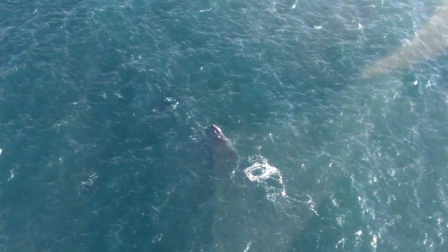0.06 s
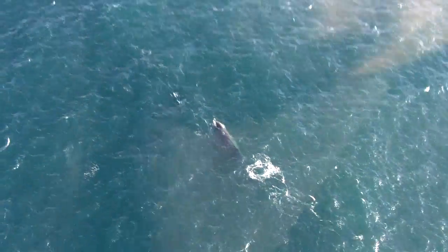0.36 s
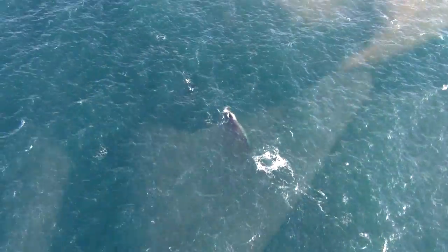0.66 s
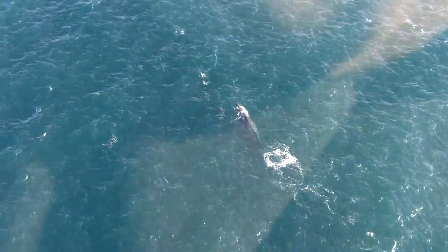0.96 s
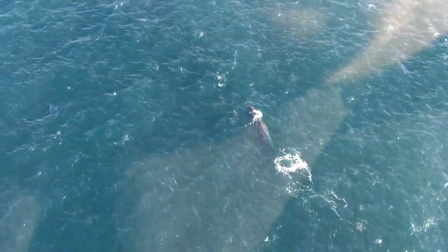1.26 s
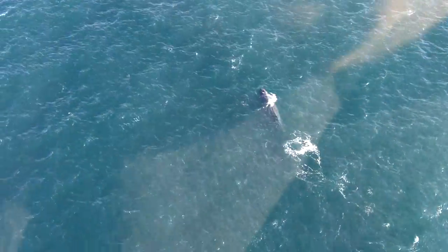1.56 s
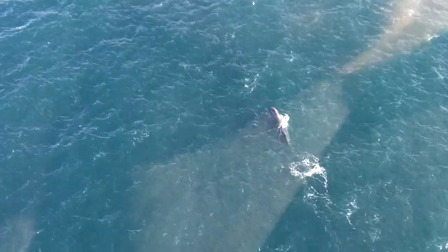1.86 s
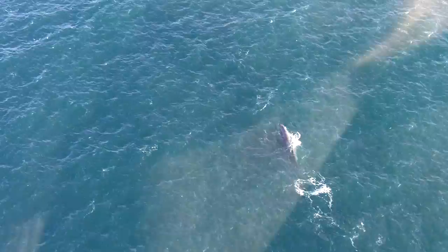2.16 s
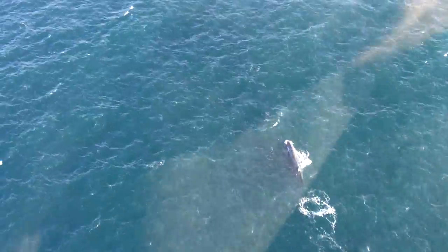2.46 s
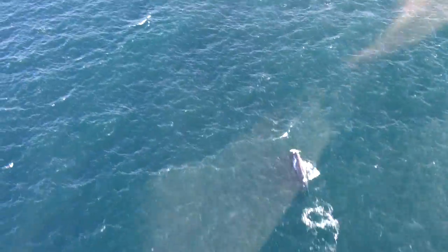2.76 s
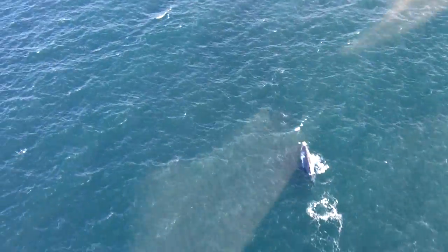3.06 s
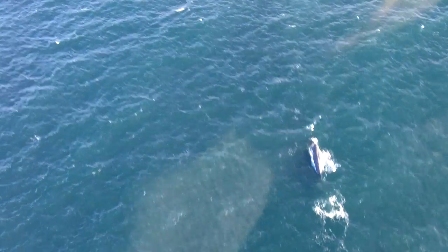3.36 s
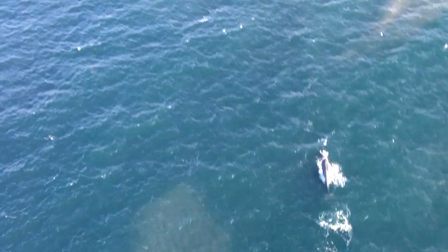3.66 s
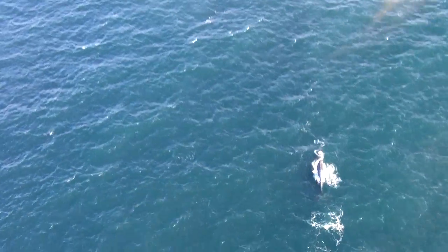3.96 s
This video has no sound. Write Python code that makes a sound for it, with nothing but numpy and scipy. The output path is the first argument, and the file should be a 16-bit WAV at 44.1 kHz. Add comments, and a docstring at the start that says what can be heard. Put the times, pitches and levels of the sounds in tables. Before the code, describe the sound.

Heard from inside the cabin over the sea, a helicopter holds a steady low hum with fast, booming blade beats. Wind gusts briefly at the start, then eases to an even roar, while gears whine very faintly.

```python
"""Inside a helicopter over the sea

The tail rotor drones on one strong low note. Under it the main rotor's blades thump rapidly,
each one pushing on the cabin and making it boom. The slipstream, the air streaming past, roars
and flutters with a thin hiss; it buffets harder for the first second, then settles.
The gears in the gearbox whine faintly."""
import sys
import numpy as np
from scipy import signal
from scipy.fft import rfft, irfft
from scipy.io import wavfile

SR = 44100
rng = np.random.default_rng(int(sys.argv[2]) if len(sys.argv) > 2 else 0)


def unload_audio(sound):
    """Save the sound as a 16-bit wav file, at the path given as the first command line argument."""
    columns = np.transpose(np.atleast_2d(sound))
    # keep every value between -1 and 1, then stretch to whole-number steps
    steps = np.round(np.clip(columns, -1, 1) * 32767)
    wavfile.write(sys.argv[1], SR, steps.astype(np.int16))


N = 176400
TIME = np.arange(N) / SR
TAIL_HZ, BLADE_HZ, FIRST_BLADE_S = 136.14, 13.614, .0698
# How many dB each sound rises when the gust rises by 1 dB.
BOOM_FOLLOWS, ROAR_FOLLOWS, RUSH_FOLLOWS, HISS_FOLLOWS = 2.8, .65, .7, 1.25

# The tones in the tail rotor's drone. Each row: multiple of TAIL_HZ, average level in dB.
DRONE_TONES = [(1, -14), (2, -42), (3, -53)]
# The tones that add up to a blade's thump. Each row: multiple of BLADE_HZ, level in dB.
THUMP_TONES = [(1, -20), (2, -34.5), (3, -38), (6, -51), (7, -48.5), (8, -50.5), (9, -51.5), (11, -37),
               (12, -47.5), (14, -40), (15, -49), (17, -58), (18, -51.5)]
# The cabin's ringing notes. Each row: pitch in Hz, strength of a blow in dB, seconds to fade by 60 dB.
CABIN_NOTES = [(53.5, -25.5, .26), (244.5, -37.5, .25)]
# The strength of the slipstream. Each row: time in seconds, strength in dB.
GUST_CURVE = [(0, 4), (.17, 4), (.55, 3), (.8, 3.5), (1.1, 2.04), (1.4, 1), (2.0, 1), (2.7, 0.94), (3.2, 1),
              (4, 0.4)]
# The air's four noises, from low to high. Each row: frequency in Hz, relative level in dB.
ROAR_SPECTRUM = [(15, 0), (40, -3.5), (85, -2), (125, 4), (175, -3), (250, -2.5), (310, -7.5), (390, -10.5),
                 (480, -14.5), (545, -14.5), (620, -20), (820, -21.5), (1040, -26), (1210, -28.5),
                 (1300, -35.5), (2500, -57)]
RUSH_SPECTRUM = [(400, -8.5), (900, 3), (1270, -5.5), (1450, 0.5), (1750, -3.5), (2000, -4), (2200, -6.5),
                 (2600, -8.5), (3100, -13.5), (3700, -20), (4300, -28.5), (8000, -48.5)]
HISS_SPECTRUM = [(2500, -14.5), (4300, -18), (4750, -8.5), (5300, -3), (6250, -0.5), (7500, -5),
                 (9000, -12), (11000, -24), (15500, -35.5)]
SIZZLE_SPECTRUM = [(4000, -20.5), (7000, -5), (9000, -0.5), (11000, -2.5), (12500, -7), (15500, -11)]
# How wide the air sounds. Each row: frequency in Hz, left-right difference against the shared part in dB.
STEREO_WIDTH = [(60, -29), (240, -38), (480, -32.5), (950, -39), (1890, -19), (3770, -4.5), (6300, -6.5),
                (9000, -2.5), (15000, -4.5)]
# Brief swells of the roar and of the hiss. Each row: time of the peak in seconds, level change in dB.
ROAR_BUFFETS = [(.47, 3), (.625, 4), (1.04, 3), (1.265, 2)]
HISS_SPURTS = [(.138, 1), (0.297, 1.5), (.618, 4.5), (0.745, 6), (.83, 5), (0.902, 2), (1.049, 6),
               (1.108, 5), (1.193, 4.5), (1.231, 3.5), (1.487, -0.5), (1.721, 5.5), (1.82, 1), (3.168, -1),
               (3.222, 5), (3.376, 0.5), (3.659, 7)]
# The whine of the gears. Each row: pitch in Hz, average level in dB.
GEAR_TONES = [(614, -64), (1093, -69), (1164, -62.5), (1210, -70.5), (1302, -72)]


def tail_rotor(wavers_per_s=11):
    """The tail rotor makes a nearly pure drone that wavers in the disturbed air."""
    phase = 2 * np.pi * TAIL_HZ * (TIME - FIRST_BLADE_S) + .03 * drift(wavers_per_s)
    waver_db = .36 * drift(wavers_per_s)
    return sum(np.sqrt(2) * from_db(db + k * waver_db) * np.cos(k * phase) for k, db in DRONE_TONES)


def main_rotor(lag_rad=.58, smear_rad=.011):
    """Each passing blade sends a sharp push of air, a little smeared by the hull."""
    phase = 2 * np.pi * BLADE_HZ * (TIME - FIRST_BLADE_S)
    return sum(np.sqrt(2) * from_db(db) * np.cos(k * phase - lag_rad - smear_rad * k * k)
               for k, db in THUMP_TONES)


def cabin_boom(gust_db, lead_s=.0042):
    """Each blade strikes the cabin like a drum, and it booms louder in a gust."""
    blow_times = FIRST_BLADE_S - lead_s + np.arange(-1, N / SR * BLADE_HZ) / BLADE_HZ
    boom = np.zeros(N)
    for hz, db, fade_s in CABIN_NOTES:
        blows = np.zeros(N + 2 * SR)  # a spare second at each end
        blow_db = db + .51 * rng.standard_normal(len(blow_times))
        blows[((blow_times + 1) * SR).astype(int)] = from_db(blow_db)
        # This filter turns each blow into a fading note.
        decay, step = np.exp(-np.log(1000) / (fade_s * SR)), 2 * np.pi * hz / SR
        ring = signal.lfilter([0, np.sin(step)], [1, -2 * decay * np.cos(step), decay ** 2], blows + 1e-18)
        follows = BOOM_FOLLOWS if hz < TAIL_HZ else ROAR_FOLLOWS
        boom += ring[SR:SR + N] * from_db(follows * gust_db)
    return boom


def slipstream(gust_db, thump, drone, pump_lag_s=.0076, swish_lead_s=.016):
    """Churning air makes four noises that flutter together; the rotors' pressure pumps rush and hiss."""
    pump = np.interp(TIME - pump_lag_s, TIME, thump / thump.std()) + .22 * drone / drone.std()
    flutter = drift(240)
    flow_db = gust_db + .51 * drift(9)
    buffet_db = bumps(ROAR_BUFFETS, width_s=.018)
    spurt_db = bumps(HISS_SPURTS, width_s=.0045)
    roar_db = -31 + ROAR_FOLLOWS * flow_db + .74 * flutter + buffet_db
    roar = air_noise(ROAR_SPECTRUM) * from_db(roar_db)
    rush_db = -56.5 + RUSH_FOLLOWS * flow_db + 1.48 * flutter + .52 * pump + .4 * spurt_db
    rush = air_noise(RUSH_SPECTRUM) * from_db(rush_db)
    hiss_db = -68 + HISS_FOLLOWS * flow_db + 1.56 * flutter + .8 * pump + spurt_db
    hiss = air_noise(HISS_SPECTRUM) * from_db(hiss_db + 1.5 * drift(300))  # fast drift adds crackle
    # The faint, bright sizzle swells just ahead of each blade.
    swish_db = 4.5 * np.cos(2 * np.pi * BLADE_HZ * (TIME - FIRST_BLADE_S + swish_lead_s))
    sizzle = air_noise(SIZZLE_SPECTRUM) * from_db(-78.5 + swish_db + 1.56 * flutter)
    return roar + rush + hiss + sizzle


def gearbox(flicker_db=3, wander_hz=5):
    """Gear teeth meet and make faint tones, unsteady in level and pitch."""
    whine = np.zeros(N)
    for hz, db in GEAR_TONES:
        gain = from_db(db + flicker_db * drift(18))
        pitch_hz = hz + wander_hz * drift(11)
        whine += np.sqrt(2) * gain * np.sin(2 * np.pi * np.cumsum(pitch_hz) / SR)
    return whine


def air_noise(spectrum):
    """Stereo noise shaped by a spectrum, with the bass nearly the same in both ears."""
    hz = np.fft.rfftfreq(N, 1 / SR)
    shared, difference = rfft(rng.standard_normal((2, N)))
    stereo = shared + gain_at(STEREO_WIDTH, hz) * difference * [[1], [-1]]
    roll_off = 1 / (1 + (hz / spectrum[-1][0]) ** 8)  # fades away past the last row
    noise = irfft(roll_off * gain_at(spectrum, hz) * stereo, N)
    return noise / noise.std()


def drift(rate):
    """A smooth random wobble, about 1 in size, that changes about rate times a second."""
    hz = np.fft.rfftfreq(N, 1 / SR)
    wobble = irfft(rfft(rng.standard_normal(N)) / (1 + (hz / rate) ** 2), N)
    return (wobble - wobble.mean()) / wobble.std()


def bumps(rows, width_s):
    """Brief bell-shaped changes of level, in dB."""
    return sum(db * np.exp(-.5 * ((TIME - peak_s) / width_s) ** 2) for peak_s, db in rows)


def gain_at(rows, hz):
    """Read between the rows of a spectrum to get the gain at each frequency."""
    row_hz, row_db = np.transpose(rows)
    return from_db(np.interp(np.log(np.maximum(hz, 1)), np.log(row_hz), row_db))


def from_db(db):
    """Turn decibels into a gain, the number to multiply a sound by."""
    return 10 ** (np.asarray(db) / 20)


def scene(left_over_right_db=.27):
    """Rotors and gears sit near the centre, with the air all around."""
    gust_db = np.interp(TIME, *np.transpose(GUST_CURVE))
    thump = main_rotor() + cabin_boom(gust_db)
    drone = tail_rotor()
    balance = from_db([[left_over_right_db / 2], [-left_over_right_db / 2]])
    machine = (thump + drone + gearbox()) * balance
    return machine + slipstream(gust_db, thump, drone)


def record(dry, offset=.04, fade_in_s=.004, cutoff_hz=15700):
    """Lift the wave a little above zero, fade it in quickly and cut off the highest treble."""
    fade_in = np.sin(np.pi / 2 * np.minimum(TIME / fade_in_s, 1)) ** 2
    treble_cut = signal.cheby2(12, 50, cutoff_hz, fs=SR, output="sos")
    return signal.sosfilt(treble_cut, (dry + offset) * fade_in)


dry = scene()
out = record(dry)
unload_audio(out)
```